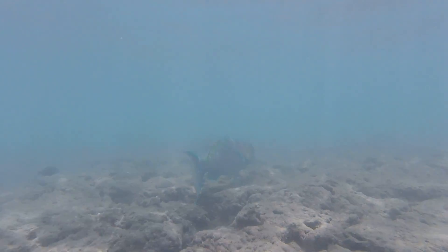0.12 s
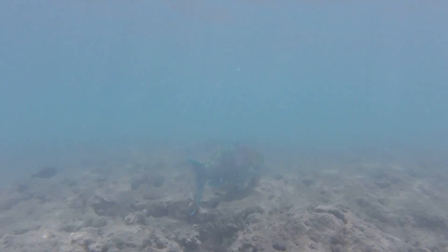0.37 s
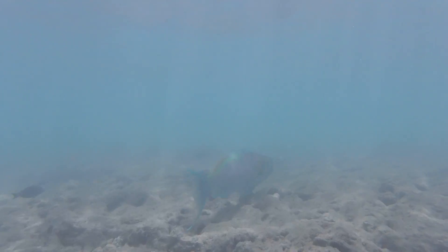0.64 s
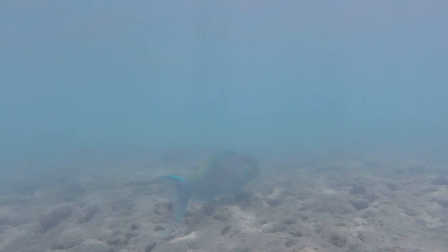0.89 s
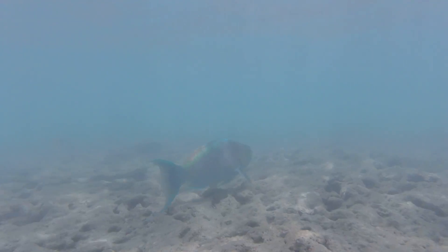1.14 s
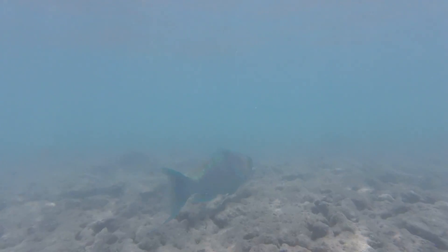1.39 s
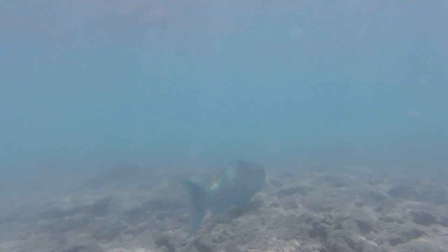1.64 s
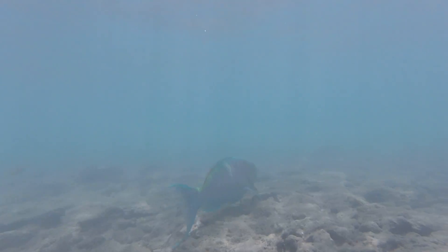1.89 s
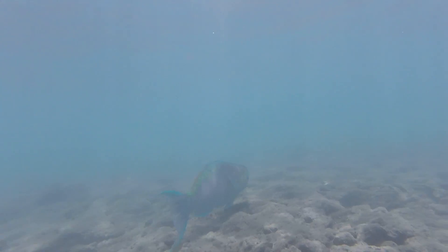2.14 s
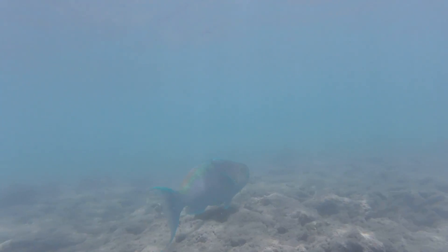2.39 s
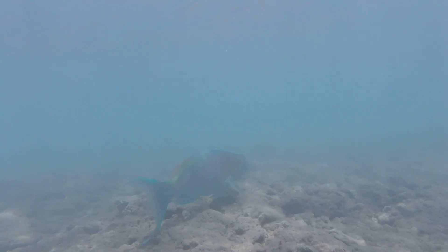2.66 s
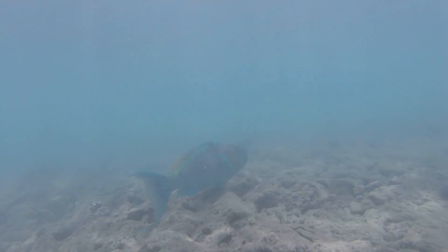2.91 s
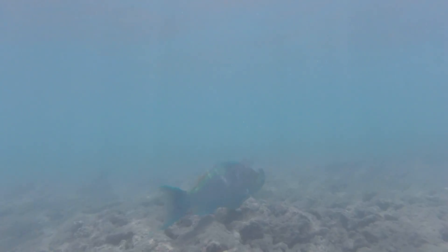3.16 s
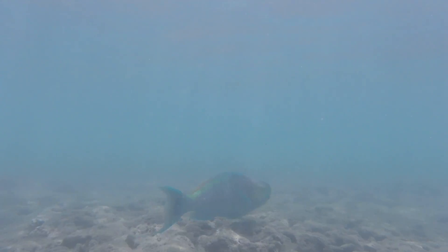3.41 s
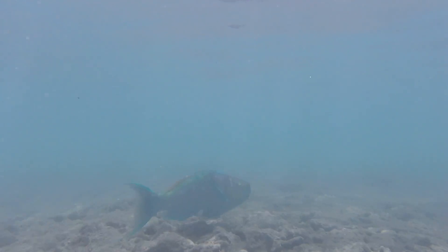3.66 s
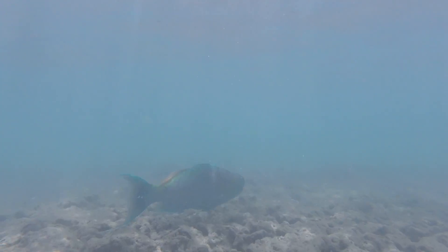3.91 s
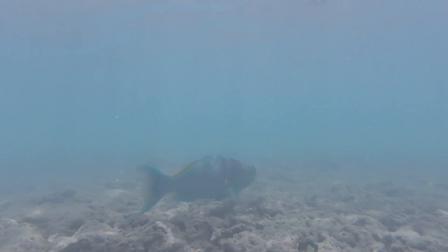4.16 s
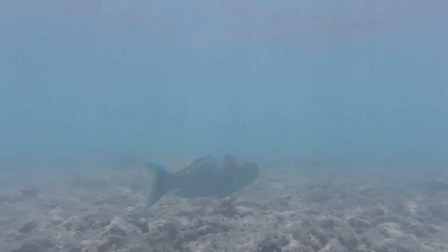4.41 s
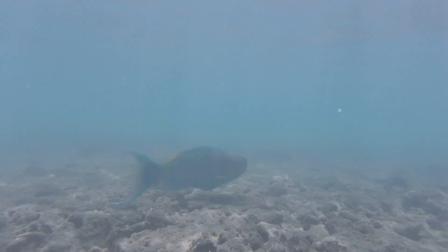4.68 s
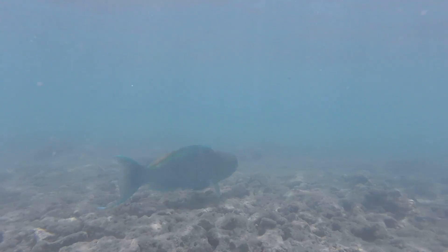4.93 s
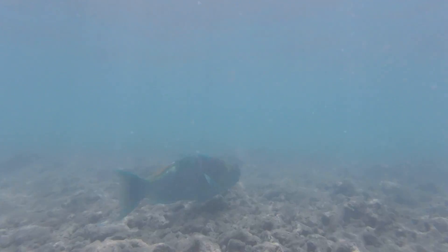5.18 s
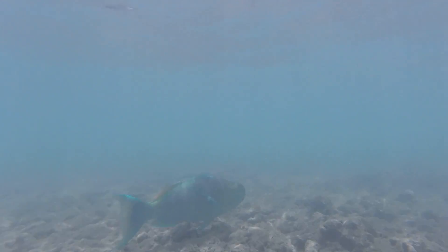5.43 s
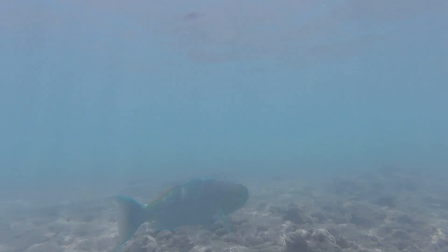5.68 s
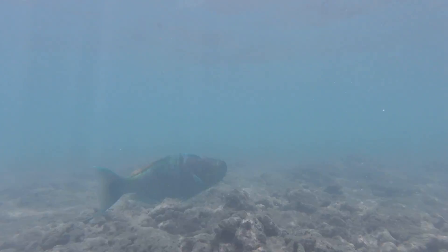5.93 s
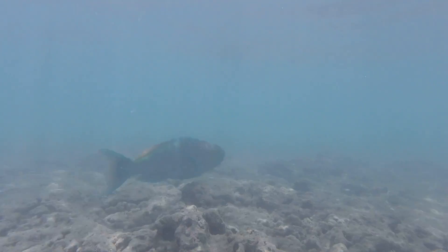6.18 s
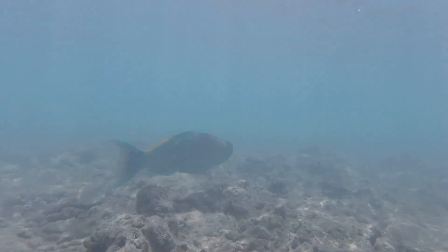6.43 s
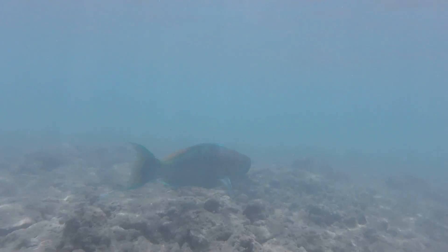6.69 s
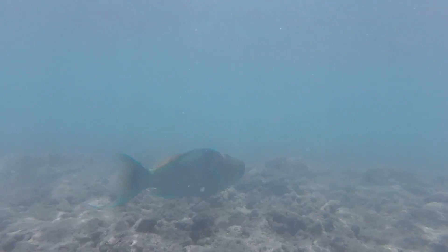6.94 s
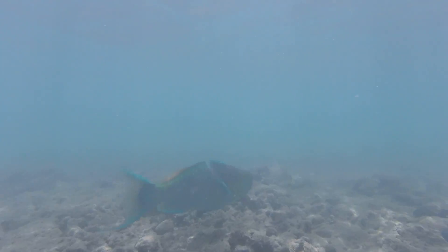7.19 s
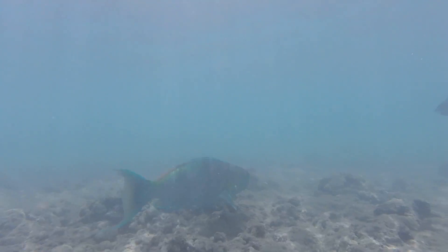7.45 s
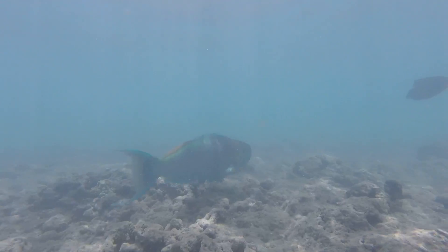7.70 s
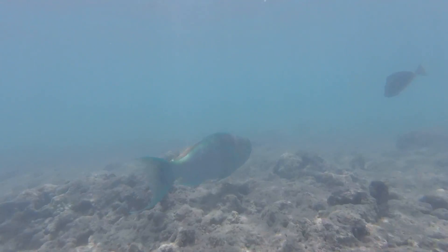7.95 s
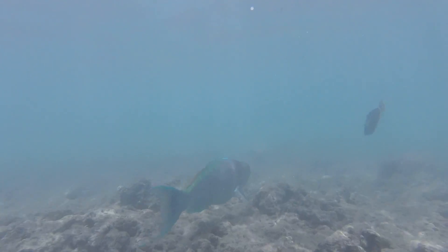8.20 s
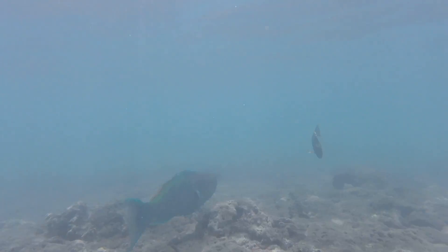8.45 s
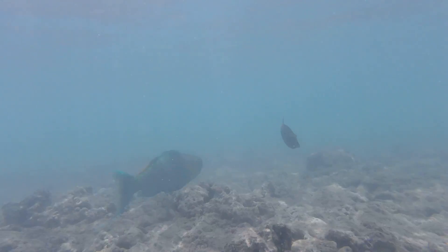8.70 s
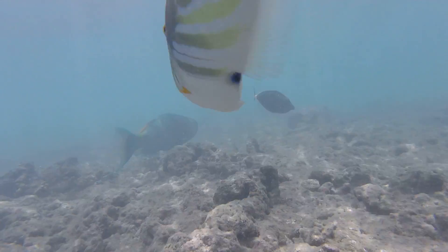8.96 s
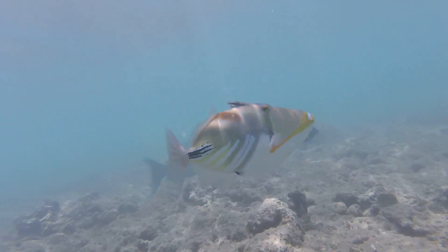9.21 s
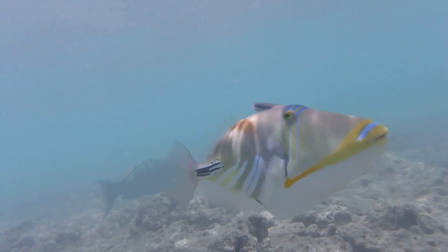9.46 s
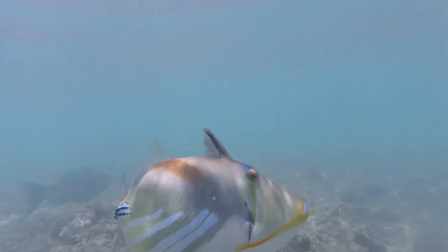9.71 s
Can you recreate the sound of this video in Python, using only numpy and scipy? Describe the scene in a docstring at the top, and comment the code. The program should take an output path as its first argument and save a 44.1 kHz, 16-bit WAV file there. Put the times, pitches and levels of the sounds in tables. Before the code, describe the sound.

Muffled water rumbles and gurgles around a submerged case amid constant reef crackling, ending with a sharp knock, quieter background and low surges.

```python
"""Water rumbles and gurgles round a small camera housing while a shallow reef crackles over a faint steady hiss.
Air pockets wobble, near snaps ring out or thud, and water thumps the housing. Late on, the background level
moves in steps, many with a tick; then come a knock on the case and a faint creak.
Water and hiss are coloured noise, the gurgle, air pockets and thumps are swelling tones, and snaps and knock
are mostly short rings of the housing and the microphone port."""
import sys
import numpy as np
from scipy import signal
from scipy.fft import rfft, irfft
from scipy.io import wavfile
from scipy.ndimage import uniform_filter1d

SR = 44100
rng = np.random.default_rng(int(sys.argv[2]) if len(sys.argv) > 2 else 0)


def master(y):
    """Save y as 16-bit WAV."""
    cut = np.clip(np.atleast_2d(y).T, -1, 1)
    pcm = np.round(cut * 32767)  # scale
    wavfile.write(sys.argv[1], SR, pcm.astype(np.int16))


def attenuation_scalar(level_db):
    """Turn a level in dB into a linear amplitude multiplier (20 dB per decade)."""
    decades = np.asarray(level_db, float) / 20
    return 10 ** decades


N = 433944  # length in samples

# steps of the background level, many with a tick:
# start_s [s], level_db after the step [dB], jump of the signal [full scale = 1]
LEVEL_STEPS = [(6.7807, -5, 0.042), (6.8133, -5.5, -0.016), (6.878, -8.5, -0.0029), (7.521, -7, -0.0041),
               (7.6769, -3, 0.01), (7.77, -3.5, 0), (8.797, -10, 0.015), (8.829, -9, 0.042),
               (8.9585, -24.5, -0.015), (8.9895, -18, 0.0065), (9.2438, -17.5, -0.024),
               (9.309, -15, 0.0011), (9.6928, -12, -0.036), (9.821, -20, 0.0051)]


def read(points, hz):
    """Reads a table of pitch and value at any pitch, on a logarithmic pitch scale."""
    f, value = np.transpose(points)
    return np.interp(np.log(hz + 1), np.log(f + 1), value)


def evened(x):
    """Scales a sound to an rms level of 1."""
    return x / np.sqrt(np.mean(x ** 2) + 1e-20)


def add(mix, s, sound):
    """Adds a sound into the mix, starting at s seconds."""
    part = mix[round(s * SR):][:len(sound)]
    part += sound[:len(part)]


def water(rows, column=1):
    """Turns one dB column of a table over time into a gain for every sample."""
    rows = np.transpose(rows)
    return attenuation_scalar(np.interp(np.arange(N) / SR, rows[0], rows[column]))


def tinted(x, points, smooth_hz):
    """Flattens the broad spectrum of x and gives it the table's colour, causally, so attacks stay sharp."""
    z = rfft(x)
    own = np.sqrt(uniform_filter1d(abs(z) ** 2, int(smooth_hz * N / SR)) + 1e-20)
    wanted = attenuation_scalar(read(points, np.arange(len(z)) * SR / N))
    # folding the cepstrum forward makes the filter minimum phase: nothing sounds ahead of an attack
    cepstrum = irfft(np.log(wanted / own), N)
    cepstrum[1:N // 2] *= 2
    cepstrum[N // 2 + 1:] = 0
    return evened(irfft(z * np.exp(rfft(cepstrum)), N))


def noise(points, size, patchy_db, flicker_db):
    """Random short-time spectra with drifting patches and a flicker shared by all pitches."""
    frames = 4 * N // size + 5
    a, b, patches = rng.standard_normal((frames, size // 2 + 1, 3)).T
    patches = uniform_filter1d(patches, size=5, axis=0)  # smooth over pitch
    patches = evened(uniform_filter1d(patches, size=4, axis=1))  # smooth over time
    flicker = rng.standard_normal(frames)
    hz = np.fft.rfftfreq(size, 1 / SR)[:, None]
    level_db = read(points, hz) + patchy_db * patches + flicker_db * flicker
    z = (a + 1j * b) * attenuation_scalar(level_db)
    return evened(signal.istft(z, nperseg=size, noverlap=3 * size // 4)[1][:N])


def ring(hz, t60, rise):
    """A struck resonance of peak 1: it fades by 60 dB in t60 seconds, after a soft start."""
    t = np.arange(int(t60 * SR) + 8) / SR
    fade = attenuation_scalar(-60 * t / t60)
    start = (1 - np.exp(-t / rise)) ** 2
    wave = fade * start * np.sin(2 * np.pi * hz * t)
    return wave / abs(wave).max()


def wobble(hz, length, glide, skew):
    """A tone that swells and fades, gliding a little; a skew under 1 makes the swell quicker than the fade."""
    u = np.linspace(0, 1, int(max(length, .001) * SR))
    swell = np.sin(np.pi * u ** skew) ** 2
    cycles = hz * length * (u - .5) * (1 + glide * (u - .5))
    return swell * np.cos(2 * np.pi * cycles)


def grains(shapes, per_s, spread_db, clump_db):
    """Plays each shape by its own sparse random train, in clumps; a few are large. Returns sound and train."""
    clumps = attenuation_scalar(clump_db * evened(uniform_filter1d(rng.standard_normal(N), size=2400)))
    size = attenuation_scalar(spread_db * np.minimum(rng.exponential(1, N), 4.5))
    size = size * (rng.random(N) < clumps * per_s / SR)  # most samples start no grain
    train = size * rng.choice([-1, 1], N)
    which = rng.integers(0, len(shapes), N)
    sound = sum(signal.oaconvolve(train * (which == k), shape)[:N] for k, shape in enumerate(shapes))
    return sound, train


def rumble():
    """Water moving round the housing makes deep noise that swells with the stir."""
    # colour of the rumble: pitch_hz [Hz], density_db [relative dB per Hz]
    rumble_colour = [(11, -31), (18, 11.5), (44, 5.5), (130, -7.5), (156, -13), (311, -20.5), (445, -19),
                     (628, -50), (900, -74), (1170, -65.5), (1980, -120)]
    # how hard the water moves: start_s [s], level_db [dB]
    stir = [(0.0, -30.5), (0.25, -25), (0.54, -32.5), (0.89, -26), (1.81, -26), (2.22, -33), (2.46, -22.5),
            (3.25, -27.5), (3.6, -19), (3.85, -29), (5.57, -29), (6.06, -14.5), (6.42, -32.5), (6.8, -14),
            (7.1, -26.5), (8.2, -27), (8.86, -21), (9.17, -17), (9.23, -1.5), (9.29, -24), (9.6, -17.5),
            (9.66, -7.5), (9.72, 2), (9.83, -1.5)]
    return water(stir) * noise(rumble_colour, size=2048, patchy_db=3.0, flicker_db=1.33)


def gurgle():
    """Many small air pockets wobble for about ten cycles each, over a soft wash."""
    # colour of the gurgle: pitch_hz [Hz], density_db [relative dB per Hz]
    gurgle_colour = [(88, -53.5), (150, -8), (259, -5), (350, 1), (472, -4), (561, -16.5), (713, -28),
                     (900, -20), (1170, -44), (1980, -120)]
    # sloshing of the water: start_s [s], level_db [dB]
    slosh = [(0.0, -30), (0.68, -36.5), (1.14, -28.5), (2.14, -50.5), (2.5, -28.5), (3.42, -28.5),
             (3.62, -37.5), (4.17, -35.5), (4.68, -28.5), (5.16, -39), (5.43, -28.5), (6.82, -28.5),
             (7.3, -29.5), (7.6, -36.5), (7.97, -28), (8.15, -46.5), (8.31, -26.5), (8.8, -28.5),
             (9.17, -35), (9.225, -24), (9.3, -42.5), (9.61, -51), (9.7, -29), (9.77, -14), (9.815, -20),
             (9.83, -35)]
    shapes = [wobble(hz, 9.5 / hz, 0.073, skew=0.57) for hz in np.geomspace(180, 800, 24)]
    pockets, _ = grains(shapes, 260., spread_db=2.0, clump_db=5.5)
    pockets = tinted(pockets, gurgle_colour, 100)
    wash = noise(gurgle_colour, size=1024, patchy_db=1.5, flicker_db=4.0)
    return water(slosh) * evened(pockets + 0.48 * wash)


def crack():
    """The modes of the housing, struck together in opposite sense; peak 1."""
    # modes of the housing: pitch_hz [Hz], level_db [relative dB], t60_s [s], rise_s [s]
    case_modes = [(2250, 0, .0027, .0005), (1250, -8, .004, .0002)]
    wave = np.zeros(400)
    for k, (hz, db, t60, rise) in enumerate(case_modes):
        add(wave, 0, (-1) ** k * attenuation_scalar(db) * ring(hz, t60, rise))
    return wave / abs(wave).max()


def edge():
    """The bright part of a snap: the microphone port rings, with two sharper rings on top."""
    wave = ring(6470, 0.0077, .0001)
    add(wave, 0, 0.6 * ring(7300, 0.0041, .00003))
    add(wave, 0, 0.68 * ring(4430, 0.0033, .00003))
    return wave


def dulled(x):
    """The housing takes the top, above 3580 Hz, off the body of a snap or blow."""
    return signal.sosfilt(signal.butter(7, 3580, fs=SR, output="sos"), x)


def crackle():
    """Dense far snaps ring or crack; a noisy blur stands for their echoes off the sea floor."""
    # colour of the crackle as the housing passes it: pitch_hz [Hz], density_db [relative dB per Hz]
    crackle_colour = [(350, -16.5), (600, -4), (716, -4.5), (799, -6), (970, -10), (1060, -2.5),
                      (1330, 3.5), (1610, -7.5), (2430, -5), (2930, -9), (3180, -14), (3550, -32.5),
                      (4500, -34.5), (5850, -36), (9900, -120)]
    # reef over time: start_s [s], level_db [dB], brightness_db of the upper band over the lower [dB]
    reef = [(0.0, -44.5, 6), (0.24, -42.5, 2.5), (0.5, -37.5, -2.5), (0.67, -42.5, 1), (0.89, -35, 7),
            (1.02, -44, 3), (1.65, -40.5, 6), (2.08, -43, 3), (2.69, -40.5, 1), (2.91, -31, -6.5),
            (3.3, -41, 2.5), (3.6, -38.5, -4.5), (3.91, -41, 1), (5.63, -41, 1.5), (6.08, -37.5, -2.5),
            (6.48, -40.5, 3.5), (6.78, -37.5, -2.5), (6.95, -39, -3), (7.35, -41, 5.5), (7.91, -36.5, -1.5),
            (8.32, -46, 6), (8.75, -42, 6), (8.9, -50.5, 1), (9.25, -47.5, 7), (9.83, -46, 7)]
    busy_db, thinning = -39, 0.72  # in lulls of the reef the snaps come fewer, not only softer
    busy = (water(reef) / attenuation_scalar(busy_db)) ** thinning
    shapes = [ring(hz, 7.2 / hz * rng.uniform(0.6, 5.5), 0.00015) for hz in np.geomspace(750, 3400, 24)]
    shapes += 11 * [0.85 * crack()]
    near, train = grains(shapes, 520. * busy, spread_db=3.6, clump_db=4.6)
    near, train = near / np.sqrt(busy), train / np.sqrt(busy)  # evens out the power of the thinned train
    blur = noise(crackle_colour, size=512, patchy_db=4.0, flicker_db=1.0)
    both = evened(tinted(near, crackle_colour, 150) + 0.65 * np.maximum(busy, .7) * blur)
    # split at 1750 Hz, then mix the two bands by the brightness over time
    low = signal.oaconvolve(both, signal.firwin(127, 1750, fs=SR), "same")
    tilt = water(reef, column=2)
    tilted = (evened(low) + tilt * evened(both - low)) / np.sqrt(1 + tilt ** 2)
    uneven_train = train * attenuation_scalar(1.9 * rng.standard_normal(N))
    bright = evened(signal.oaconvolve(uneven_train, edge())[:N])
    return water(reef) * (tilted + attenuation_scalar(-27.5) * bright)


def hiss():
    """The distant reef blends into a steady bright hiss."""
    # colour of the hiss: pitch_hz [Hz], density_db [relative dB per Hz]
    hiss_colour = [(1940, -21), (3300, -12.5), (3570, -15), (4590, -27), (5650, -22), (6340, -17),
                   (6620, -8), (7080, -16), (8760, -18.5), (10200, -30.5), (12000, -27), (12900, -28),
                   (14200, -76.5)]
    return attenuation_scalar(-61.5) * noise(hiss_colour, size=256, patchy_db=4.0, flicker_db=0.4)


def bubble(s, db, hz):
    """One air pocket as a wobbling tone, strongest shortly after s; higher pockets ring for more cycles."""
    cycles, middle_hz = 10.9, 337.6  # cycles of a pocket at the middle pitch
    length = cycles / np.sqrt(hz * middle_hz)
    skew = 0.7 * (middle_hz / hz) ** 0.29  # small pockets start more abruptly
    return s - 0.1865 * skew * length, attenuation_scalar(db) * wobble(hz, length, 0.0091, skew)


def bubbles():
    """The largest air pockets wobble near the housing, each at its own pitch."""
    # air pockets: start_s [s], level_db [peak dB], pitch_hz [Hz]
    pocket_rows = [(0.3755, -31, 1340), (0.4537, -23, 1260), (0.483, -32, 575), (0.55, -24.5, 432),
                   (0.869, -30, 2500), (0.884, -24, 2830), (0.898, -30, 827), (0.901, -21, 2370),
                   (0.96, -18.5, 372), (1.012, -20, 318), (1.052, -14, 330), (1.072, -21, 302),
                   (1.692, -31, 1070), (1.705, -32, 1070), (2.013, -26, 458), (2.271, -29.5, 1340),
                   (2.393, -22.5, 345), (2.636, -20, 383), (2.669, -20.5, 364), (2.818, -21.5, 1184),
                   (2.847, -23, 343), (2.848, -22.5, 1040), (2.872, -26, 1090), (2.9108, -28, 1180),
                   (2.934, -17.5, 349), (2.965, -19.5, 330), (3.013, -18.5, 410), (3.07, -27, 1115),
                   (3.23, -32, 1340), (3.382, -6.5, 352), (3.445, -14, 355), (3.772, -23.5, 357),
                   (4.19, -31.5, 1220), (4.191, -29, 2230), (4.2625, -26, 2330), (4.366, -17, 369),
                   (4.543, -22, 420), (4.608, -30, 1120), (4.643, -14.5, 448), (4.698, -20, 374),
                   (4.764, -22.5, 600), (4.781, -23.5, 286), (4.808, -27, 2450), (4.974, -22.5, 320),
                   (5.217, -27, 391), (5.268, -21, 366), (5.372, -14.5, 370), (5.624, -24, 436),
                   (5.78, -18, 421), (5.8651, -33, 1370), (5.963, -32, 844), (6.038, -30, 1360),
                   (6.233, -28, 1310), (6.337, -19, 335), (6.511, -18, 287), (6.763, -21, 298),
                   (7.511, -27.5, 464), (7.757, -32.5, 924), (8.249, -17, 280), (8.32, -18, 370)]
    sound = np.zeros(N)
    for row in pocket_rows:
        add(sound, *bubble(*row))
    return sound


def snaps():
    """Near snaps from the reef: a short ring at their own pitch, a broad crack, a bright edge, a faint echo."""
    # nearest snaps: start_s [s], level_db [dB], pitch_hz [Hz], treble_db [dB relative to level_db]
    snap_rows = [(0.4905, -19, 2280, -19), (0.7075, -4.5, 2100, -60), (0.7266, -15.5, 1340, -33),
                 (0.7419, -15, 1380, -42), (0.7803, -16.5, 2060, -36), (0.8088, -11.5, 1720, -48),
                 (1.1827, -19, 2300, -36), (1.286, -10, 2750, -25.5), (1.574, -17, 2600, -41),
                 (1.683, -37, 2900, 3.5), (1.6897, -15, 2840, -45), (1.7, -21, 2150, -37),
                 (1.7433, -17, 2600, -30), (1.7485, -13, 1610, -37), (1.8226, -17, 2490, -25),
                 (2.3534, -17, 1450, -23), (2.454, -18.5, 2370, -44), (2.639, -17, 960, -40),
                 (2.737, -13, 2010, -44), (2.7719, -12.5, 2630, -30), (2.819, -12, 1610, -41),
                 (2.855, -15, 2000, -41), (2.975, -15, 2280, -31), (3.028, -8.5, 1380, -47),
                 (3.312, -11.5, 1700, -31), (3.426, -14.5, 2420, -32), (3.76, -20.5, 1320, -30),
                 (3.8481, -21, 2700, -37), (4.0127, -18, 2460, -31), (4.0487, -14, 1280, -39),
                 (4.0672, -17.5, 2230, -31), (4.0883, -23, 2290, -28), (4.235, -13.5, 1510, -46),
                 (4.243, -17, 1440, -40), (4.293, -22.5, 2430, -31), (4.351, -20, 2420, -39),
                 (4.4522, -19.5, 2660, -26), (4.604, -14, 1300, -31), (4.638, -17, 2570, -36),
                 (4.789, -17, 2400, -35), (4.9336, -17.5, 1300, -21), (5.104, -22, 2380, -30),
                 (5.117, -21, 1370, -35), (5.1738, -19, 2470, -22.5), (5.248, -23, 2960, -21.5),
                 (5.3404, -20, 1110, -38), (5.3528, -10.5, 2600, -26), (5.435, -18.5, 2830, -25),
                 (6.113, -8, 1530, -52), (6.2636, -15, 2280, -26), (6.444, -17.5, 2360, -30),
                 (6.49, -24, 2380, -35), (6.6204, -15.5, 1170, -45), (7.054, -23.5, 2180, -37),
                 (7.095, -22, 2270, -29), (7.641, -29, 2100, -25), (7.865, -22, 2700, -26),
                 (8.1927, -21, 1530, -44), (8.2017, -17, 1390, -41), (8.218, -12.5, 2410, -31),
                 (8.2811, -24, 2510, -24), (8.327, -26, 2520, -23), (8.408, -18.5, 1310, -33),
                 (8.4319, -4.5, 1620, -22.5), (8.444, -19, 1500, -43), (8.6085, -21, 1830, -33),
                 (8.6146, -11.5, 1630, -36), (8.7201, -22, 2400, -35), (8.741, -13, 2830, -26),
                 (9.0975, -36, 2150, -37), (9.1373, -33, 2280, -45), (9.1696, -35, 2630, -33),
                 (9.314, -25.5, 1660, -45), (9.325, -29, 1350, -39), (9.428, -34, 2540, -32),
                 (9.473, -25, 2270, -36), (9.506, -34, 1250, -31), (9.7827, -17.5, 1930, -35),
                 (9.801, -22, 1400, -42)]
    body, bright = np.zeros(N), np.zeros(N)
    for s, db, hz, treble_db in snap_rows:
        add(body, s, attenuation_scalar(db - 8.5) * ring(hz, 15.1 / hz, 0.00045))
        add(body, s, attenuation_scalar(db - 8.5) * crack())
        add(bright, s, attenuation_scalar(db + treble_db) * edge())
        add(body, s + 0.002274, attenuation_scalar(db - 18.0) * ring(1.18 * hz, 0.01, 0.00008))  # echo
    return dulled(body) + bright


def thumps():
    """Short swelling tones: mostly low thumps of water on the housing, and at 5.35 s the brief thud of a near snap."""
    # thumps and the one thud: middle_s [s], level_db [dB], pitch_hz [Hz], length_s [s]
    thump_rows = [(0.889, -20, 40.2, 0.034), (2.46, -17.5, 146, 0.025), (5.3543, -16, 880, 0.0021),
                  (6.864, -8.5, 70, 0.084), (7.737, -7.5, 136, 0.0069), (7.765, -19.5, 123.4, 0.11),
                  (8.851, -12, 28, 0.091), (9.218, -34, 91, 0.042), (9.239, -26, 60.4, 0.034),
                  (9.739, -9.5, 71, 0.021), (9.767, -10, 60, 0.018)]
    sound = np.zeros(N)
    for s, db, hz, length in thump_rows:
        add(sound, s - length / 2, attenuation_scalar(db) * wobble(hz, length, -0.11, 0.98))
    return sound


def stepped():
    """Gain over time of the background: it holds each level until the next step, with short ramps."""
    s, db, _ = np.transpose(LEVEL_STEPS)
    latest = np.searchsorted(s, np.arange(N) / SR)
    return attenuation_scalar(uniform_filter1d(np.append(0, db)[latest], size=64))


def knock():
    """A blow on the case and its bounces: each rings the case, flashes the port and pushes the microphone."""
    # blows: start_s [s], level_db [dB], treble_db [dB relative to level_db], push_db [dB]
    blow_rows = [(8.9269, -26.5, -38, -23), (8.9287, -5, -25, -10), (8.931, -6, -38, -10),
                 (8.9343, -7.5, -48, -17), (8.9384, -17.5, -40, -24.5)]
    body, bright = np.zeros(N), np.zeros(N)
    for s, db, treble_db, push_db in blow_rows:
        add(body, s, -attenuation_scalar(db) * crack())
        add(bright, s, attenuation_scalar(db + treble_db) * edge())
        add(body, s, attenuation_scalar(push_db) * ring(170, 0.0069, 0.0019))
    return dulled(body) + bright


def creak():
    """A faint creak of slips that slow down, each a short dull tick in the case."""
    # the creak over time: start_s [s], level_db [dB], slips_per_s [1/s]
    slip_rows = [(9.536, -54, 500), (9.58, -51, 430), (9.62, -51, 320), (9.645, -51, 230),
                 (9.68, -52.5, 160), (9.712, -55, 120)]
    s, db, per_s = np.transpose(slip_rows)
    t = np.arange(s[0], s[-1], 1 / SR)
    jitter = .13 * evened(uniform_filter1d(rng.standard_normal(len(t)), size=90))
    turns = np.cumsum(np.interp(t, s, per_s) * (1 + jitter)) / SR
    slips = np.diff(np.floor(turns), prepend=0)  # one slip at each whole turn
    slips = slips * attenuation_scalar(2.2 * rng.standard_normal(len(t)))
    ticks = np.convolve(slips, uniform_filter1d(crack(), size=9))[:len(t)]
    ticks = signal.sosfilt(signal.butter(2, 1000, "high", fs=SR, output="sos"), dulled(ticks))
    sound = np.zeros(N)
    add(sound, s[0], attenuation_scalar(np.interp(t, s, db)) * evened(ticks))
    return sound


def scene():
    """Mixes the background, whose level moves in steps, with the single events."""
    background = rumble() + gurgle() + crackle() + hiss()
    events = bubbles() + snaps() + thumps() + knock() + creak()
    return (stepped() * background + events)[None]


def band_limit(x):
    """A steep low-pass at the top of the band."""
    return signal.sosfilt(signal.butter(12, 14340, fs=SR, output="sos"), x)


def record(dry):
    """A pinned microphone passes almost no change; jumps tick; the bass cut lets every offset relax to zero."""
    # a surge presses the microphone to its stop:
    # start_s [s], end_s [s], rise of pressure before and jump at the start [signal units]
    pinned = [(8.8934, 8.9266, .62, -.09), (8.9415, 8.9575, 0, 0)]
    change, jumps = np.diff(dry[0], prepend=0), np.zeros(N)
    rush = np.sin(np.linspace(0, 2.6, 600))
    for start, end, rise, jump in pinned:
        add(change, start - len(rush) / SR, rise * rush / rush.sum())  # pressure climbs to the stop in 14 ms
        change[round(start * SR):round(end * SR)] *= .02
        jumps[round(start * SR)] = jump
    for s, _, jump in LEVEL_STEPS:
        jumps[round(s * SR)] += jump
    change += signal.lfilter(*signal.butter(3, 10000, fs=SR), jumps)
    # summing the changes with a leak rebuilds the signal with a bass cut at 28 Hz
    relaxed = signal.lfilter([1], [1, -np.exp(-2 * np.pi * 28 / SR)], change)
    return band_limit(relaxed[None])


dry = scene()
out = record(dry)
master(out)
```